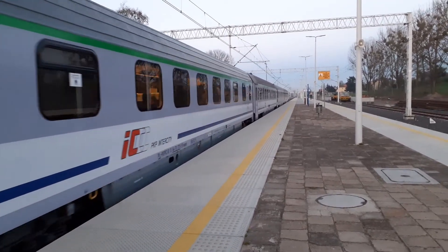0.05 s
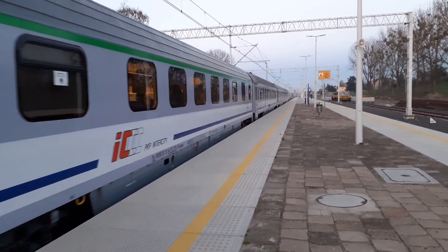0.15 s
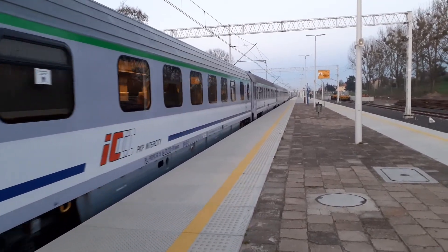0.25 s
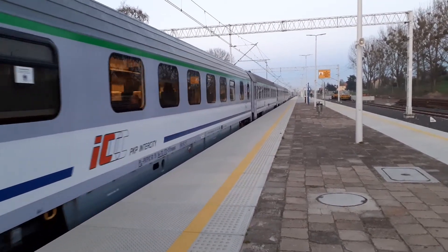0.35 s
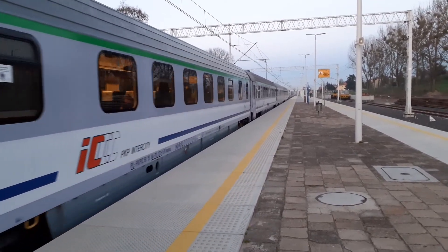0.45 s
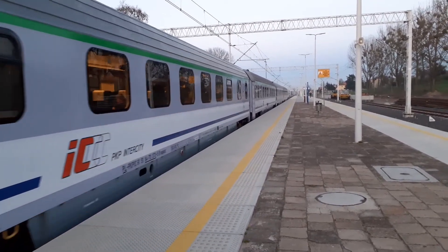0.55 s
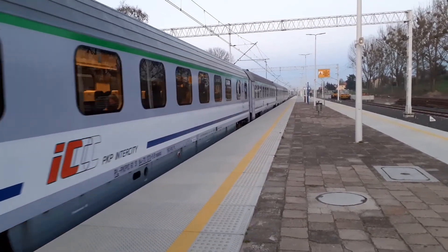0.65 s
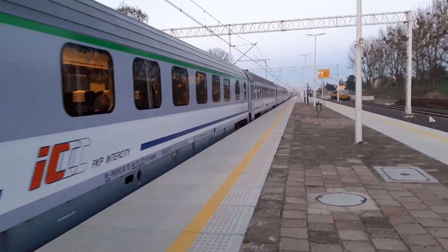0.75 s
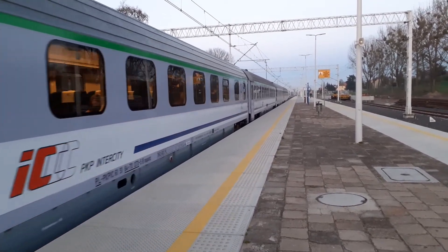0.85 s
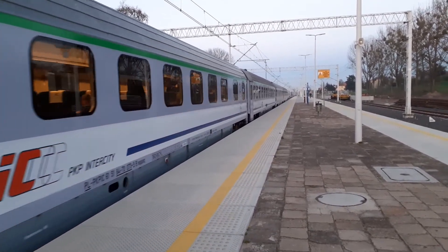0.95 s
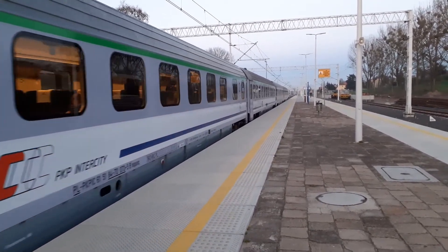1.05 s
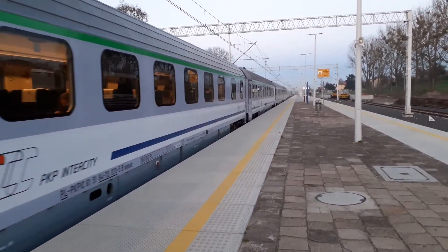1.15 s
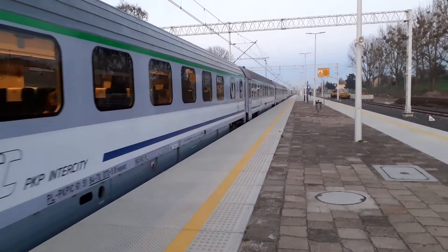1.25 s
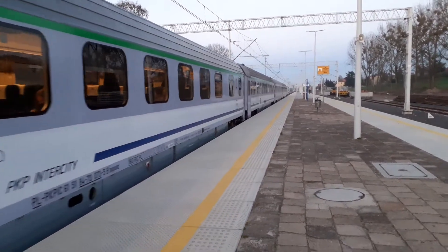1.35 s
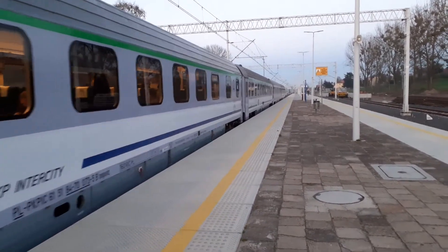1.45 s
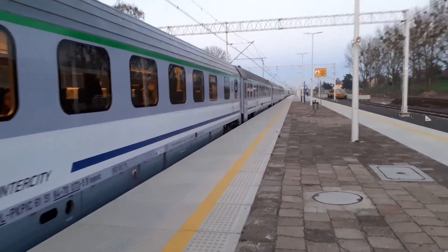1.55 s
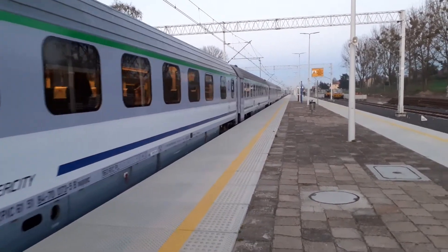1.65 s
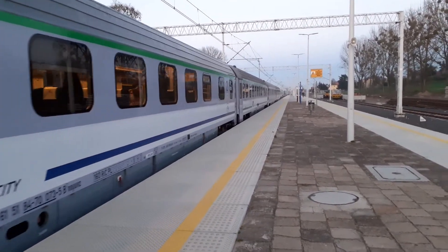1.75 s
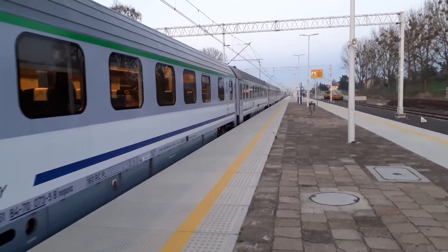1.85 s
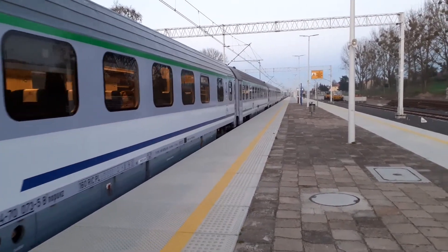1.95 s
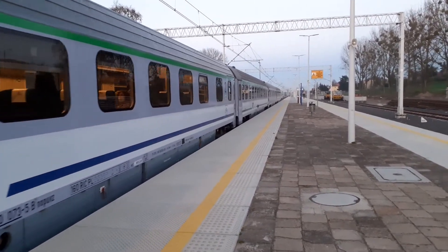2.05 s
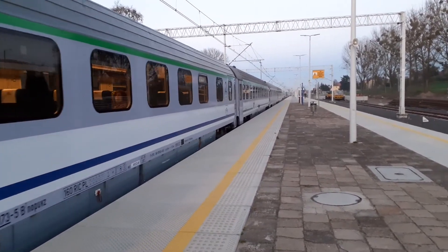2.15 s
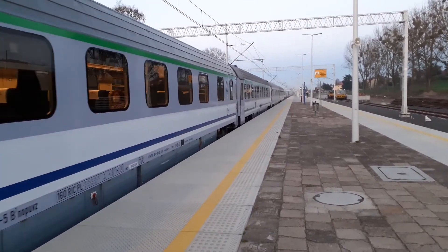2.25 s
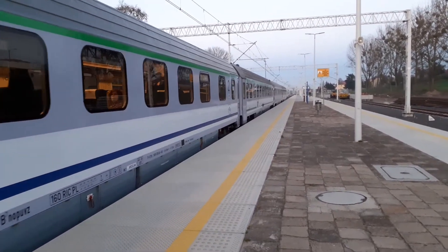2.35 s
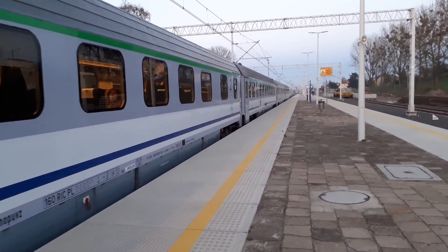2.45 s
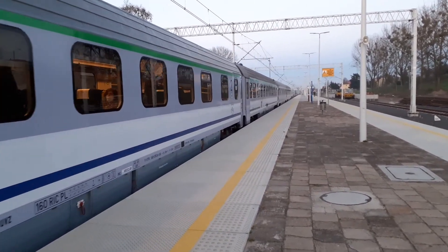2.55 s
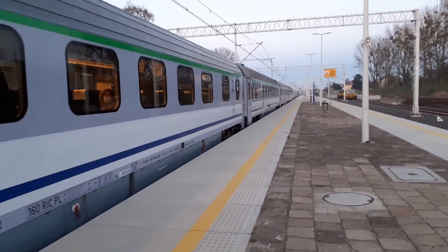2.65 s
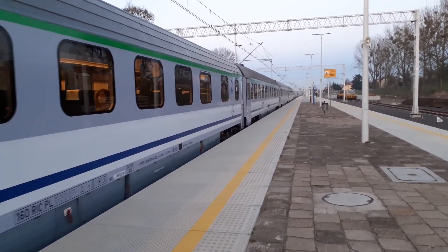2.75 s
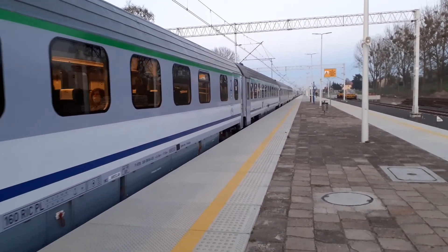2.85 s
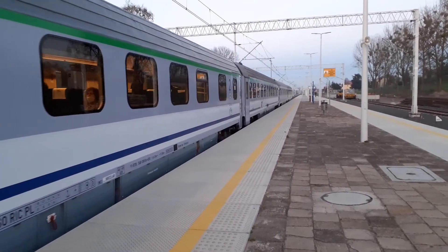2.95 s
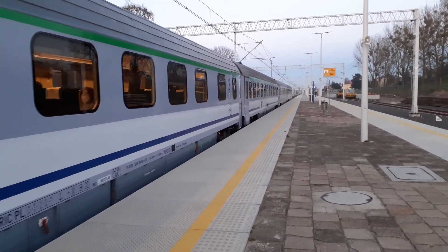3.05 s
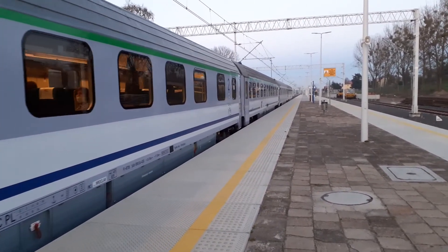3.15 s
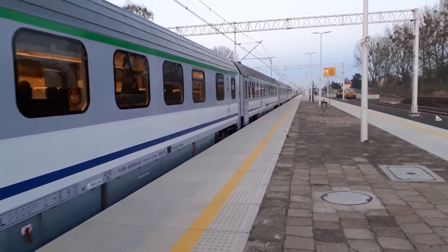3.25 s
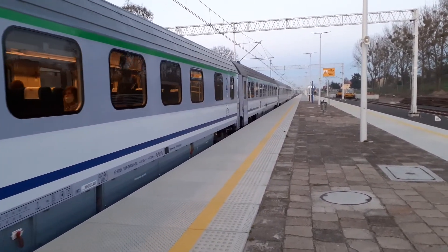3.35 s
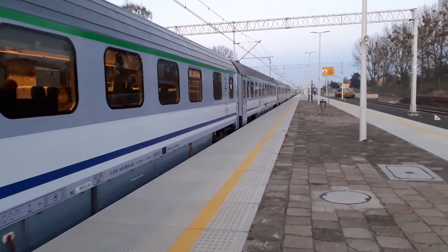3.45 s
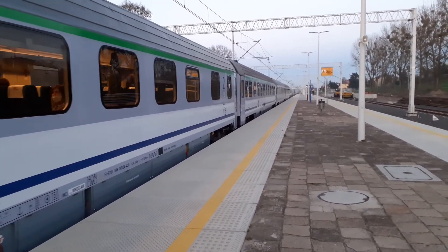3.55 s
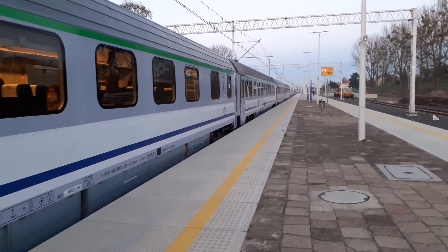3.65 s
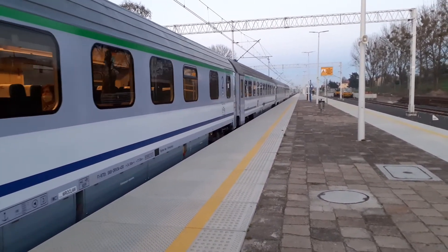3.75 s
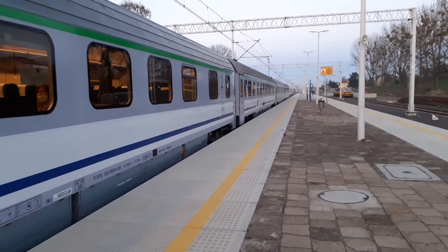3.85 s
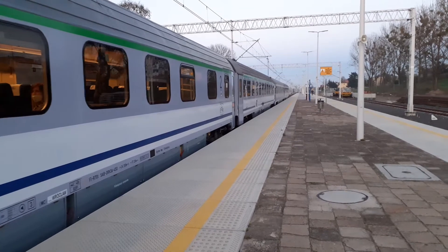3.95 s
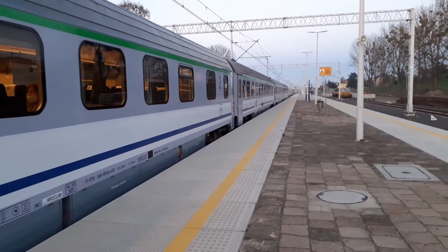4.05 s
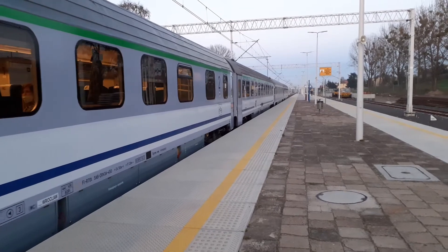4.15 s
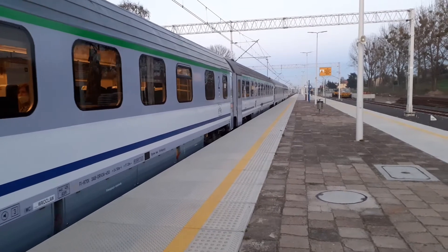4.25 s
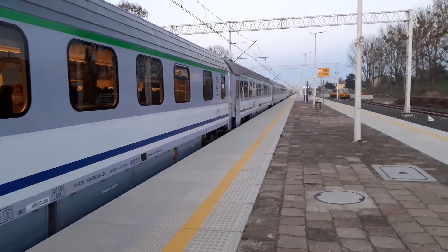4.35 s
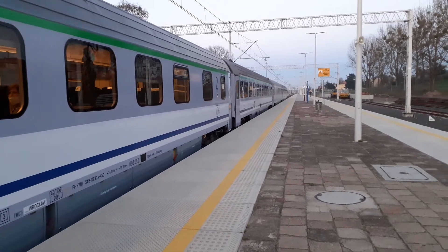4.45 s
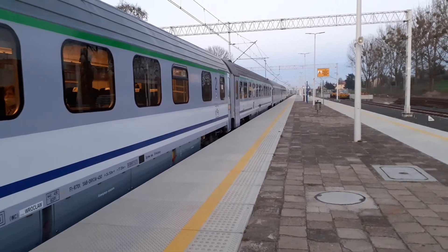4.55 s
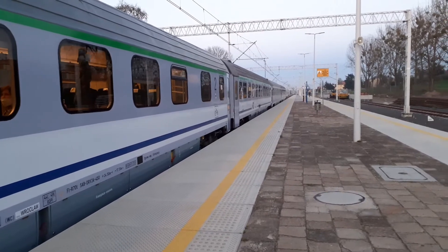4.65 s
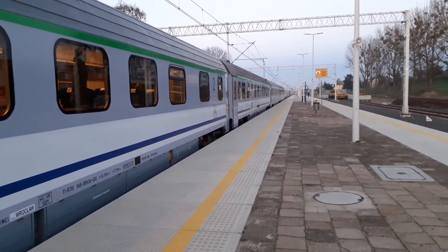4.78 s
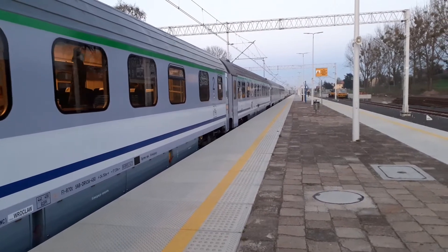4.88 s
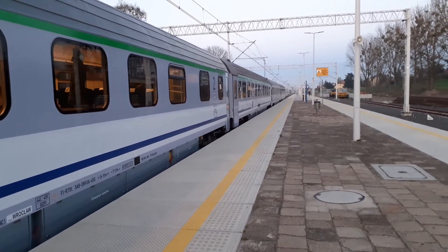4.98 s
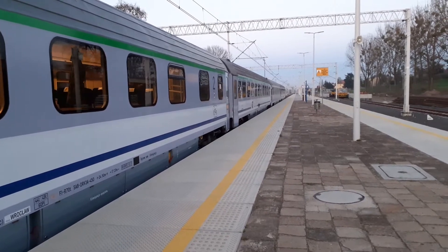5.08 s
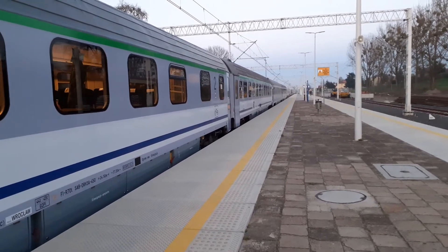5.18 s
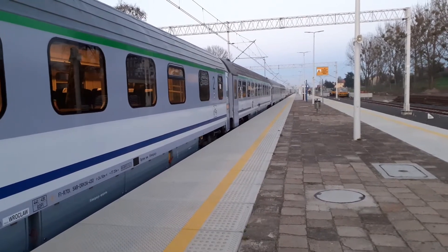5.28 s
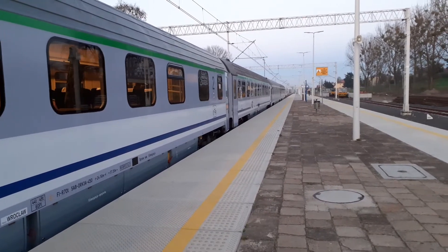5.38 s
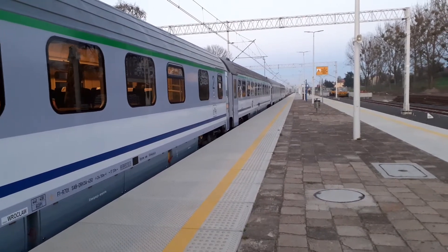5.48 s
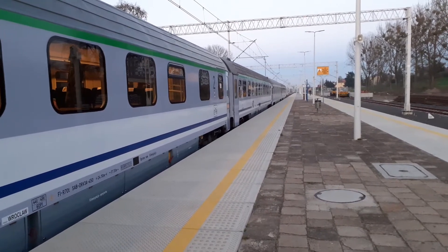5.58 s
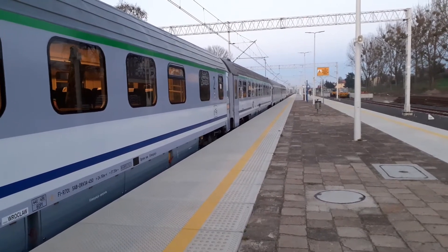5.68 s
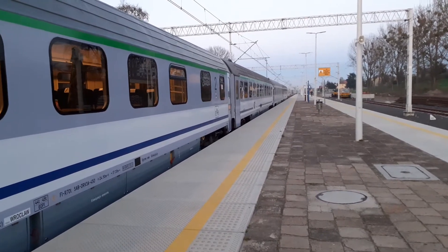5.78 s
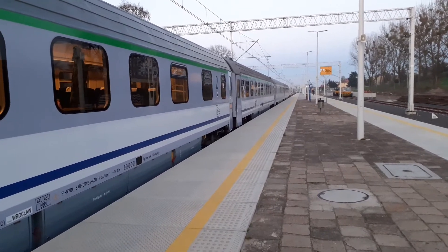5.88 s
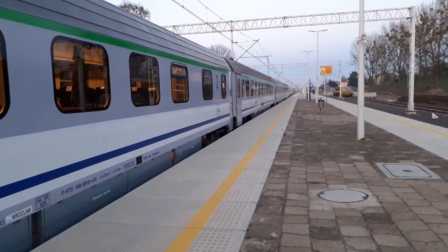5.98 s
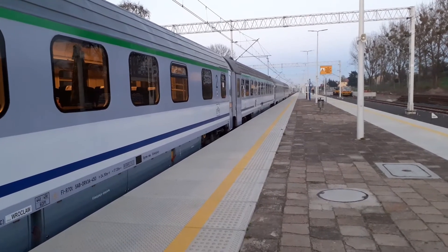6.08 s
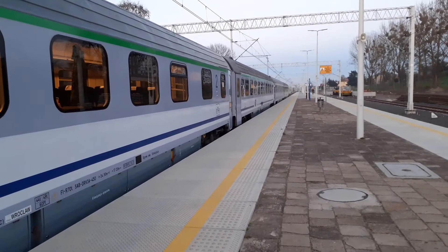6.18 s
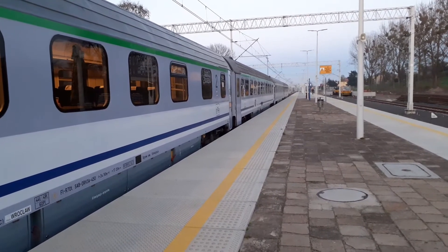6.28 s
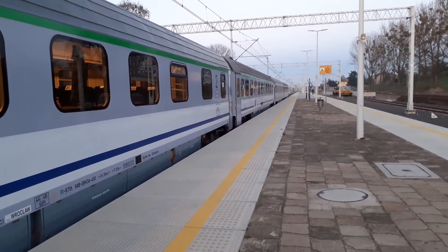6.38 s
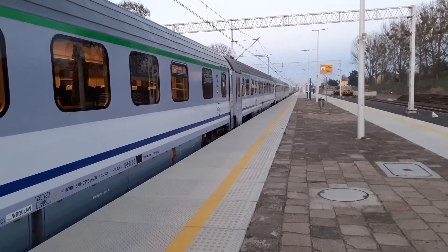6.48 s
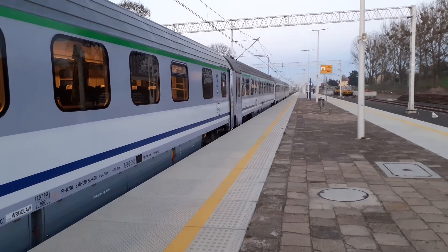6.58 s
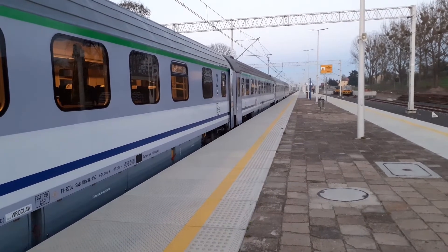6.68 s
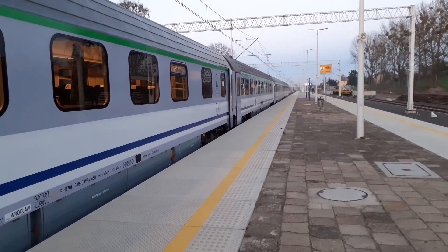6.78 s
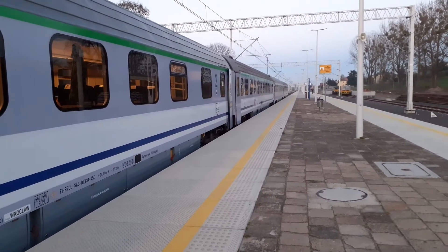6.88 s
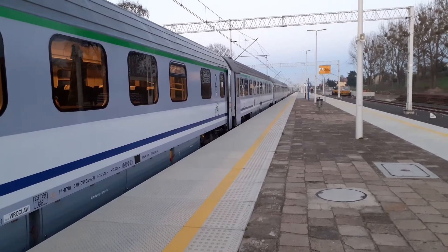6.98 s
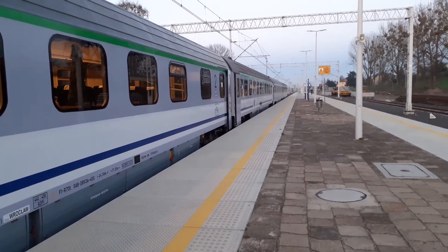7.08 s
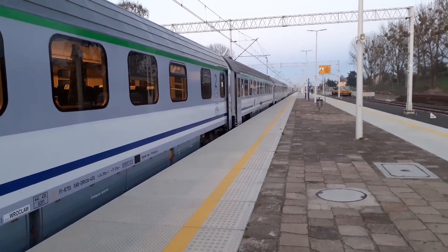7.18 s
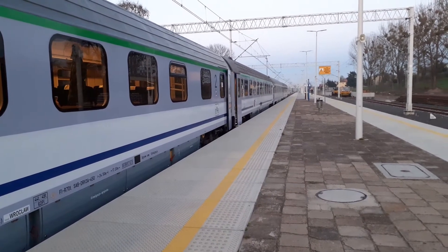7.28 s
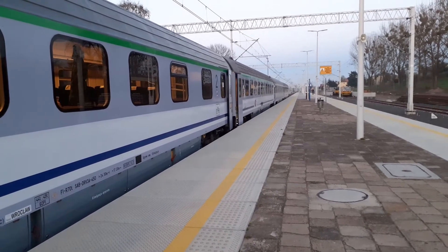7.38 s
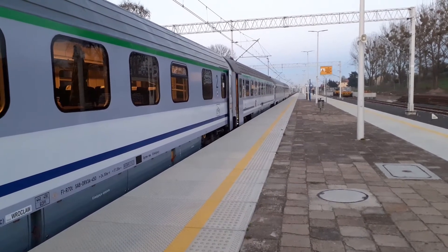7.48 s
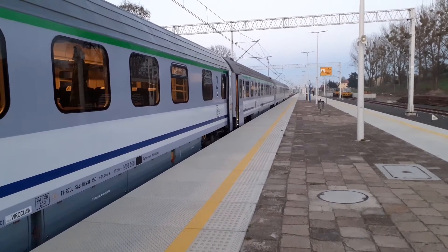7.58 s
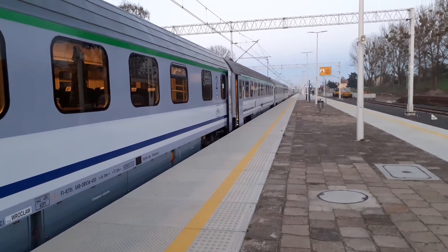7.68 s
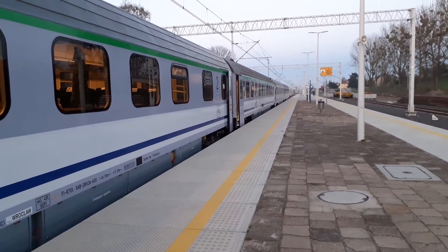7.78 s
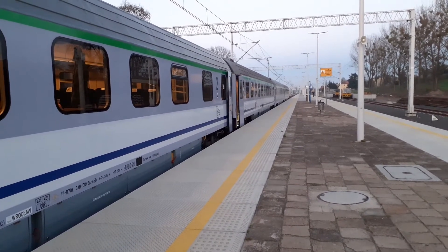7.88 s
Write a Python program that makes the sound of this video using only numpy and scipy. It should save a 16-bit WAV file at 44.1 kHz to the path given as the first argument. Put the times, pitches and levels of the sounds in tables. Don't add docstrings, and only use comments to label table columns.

```python
import sys
import numpy as np
from scipy import signal
from scipy.fft import rfft, irfft, next_fast_len
from scipy.io import wavfile
from scipy.ndimage import uniform_filter1d, map_coordinates

SR = 44100
rng = np.random.default_rng(int(sys.argv[2]) if len(sys.argv) > 2 else 0)


def gain_from_db(level_db):
    decades = np.asarray(level_db, float) / 20
    return 10 ** decades


def digitize_waveform(pressure):
    field = np.atleast_2d(pressure).T
    bounded = np.clip(field, -1, 1)
    quanta = np.round(bounded * 32767).astype(np.int16)
    wavfile.write(sys.argv[1], SR, quanta)


N = 349713
T = np.arange(N) / SR

# peak_s [s], peak_db [dB], grow_s [s], lose_s [s]
FLUTTER_BURSTS = [(2.15, -40, .39, .32), (2.36, -32, .05, .035), (2.395, -37, .03, .03),
                  (2.44, -34, .05, .04), (2.467, -31, .04, .03), (2.492, -27.5, .015, .013),
                  (2.51, -26, .014, .015), (2.543, -23.5, .033, .035), (2.595, -27.5, .035, .025),
                  (2.635, -32, .035, .03), (2.66, -22.5, .027, .022), (2.68, -33, .02, .03),
                  (2.737, -26, .04, .025), (2.78, -35, .03, .02), (2.806, -22, .018, .05),
                  (2.825, -19.5, .06, .06), (2.857, -17.5, .025, .035), (2.885, -32, .03, .02),
                  (2.925, -26, .035, .035), (2.955, -32, .02, .02), (2.972, -30, .02, .025),
                  (2.995, -35, .012, .012), (3.03, -37, .1, .2), (3.62, -34, .03, .025),
                  (3.652, -35, .02, .015), (3.687, -31, .025, .02), (3.72, -37, .03, .04),
                  (3.9, -39, .4, .25)]
CLEAN_BURSTS = [(3.225, -35, .049, .067), (3.33, -31, .04, .04), (3.385, -29, .1, .1),
                (3.43, -24.5, .09, .06), (3.48, -21, .04, .06), (3.5, -20, .05, .055),
                (3.543, -18.5, .035, .04), (3.568, -21, .03, .025), (4.09, -32, .066, .136)]
# peak_s [s], peak_db [dB], grow_s [s], lose_s [s]
ROD_BURSTS = [
    (3.82, -44.5, 0.1349, 0.2714),
    (4.15, -56, 0.269, .25),
]
# peak_s [s], peak_db [dB], grow_s [s], lose_s [s]
UPPER_BURSTS = [
    (5.22, -21.5, .075, .08),
    (5.255, -16.5, .07, .1),
    (5.3, -14.5, .12, .17),
    (5.42, -24.5, .1, .164),
    (5.68, -52.5, .2, .334),
]
LOWER_BURSTS = [(4.775, -37, .036, .07), (4.88, -47, .1, .1), (5.02, -27, .064, .045),
                (5.11, -28, .023, .05), (5.14, -21, .03, .05), (5.162, -17, .045, .025),
                (5.205, -25, .06, .08), (5.235, -21.5, .05, .08), (5.26, -22, .1, .166),
                (5.42, -34, .1, .208), (5.62, -49, .2, .17)]
# peak_s [s], peak_db [dB], grow_s [s], lose_s [s]
HALF_BURSTS = [(4.755, -33, 0.03827, .03), (4.785, -31, .03, .04), (4.835, -37.5, .02, 0.0406),
               (5.16, -37.5, 0.033, .04), (5.195, -35, .03, 0.04886), (5.28, -31.5, 0.03866, 0.0886),
               (5.35, -52.5, .3, 0.3088)]
QUARTER_BURSTS = [
    (4.77, -35.5, 0.0648, 0.0525),
    (4.815, -43, .05, 0.0725),
]
# time_s [s], below_upper_hz [Hz]
MODE_SPLIT = [(4.6647, 28), (5.172, 28), (5.18, 42), (5.228, 42), (5.234, 21), (5.29, 22.6), (5.33, 28.5),
              (5.4, 28.1), (6, 28)]
# multiple [ratio], level_db [dB]
OVERTONES = [(1, 0.5), (1.5, -44), (2, -42), (2.5, -46), (3, -45)]
WHEEL_HZ, UPPER_HZ, HALF_HZ, QUARTER_HZ, ROD_HZ = 4639, 4724, 2353, 1170, 600
LAST_WHEEL_S = (4.6647, 6)
DRIFT_HZ = 14

# time_s [s], slip_rate_hz [Hz], level_db [dB]
GROAN_PATH = [(4.74, 800, -55), (4.8, 795, -44.5), (4.9, 785, -45.5), (4.93, 748, -43.5), (5.12, 750, -45),
              (5.27, 778, -45.5), (5.35, 785, -57.5), (5.43, 792, -49.5), (5.72, 797, -68.5)]
# multiple [ratio], level_db [dB]
GROAN_MULTIPLES = [(3, -4), (4, -4.5), (5, -6.5), (7, -3.5), (8, -20)]
# peak_s [s], peak_db [dB], grow_s [s], lose_s [s]
GROAN_FLARE = [
    (4.945, -34.5, .04, 0.086),
]
# start_s [s], end_s [s], slip_rate_hz [Hz], level_db [dB]
SLIPS = [
    (3.78, 3.862, 828.7, -49),
    (4.01, 4.162, 820.3, -50),
    (4.21, 4.31, 622.4, -47.5),
    (4.28, 4.438, 779.5, -52),
    (4.39, 4.492, 618.5, -46.5),
    (4.451, 4.601, 786.3, -50),
]
# multiple [ratio], level_db [dB]
SLOW_SLIP = [(1, 2), (3, -1.5), (4, -4.5), (5, -5), (6, -0.5)]
FAST_SLIP = [(1, 2), (2, 0), (3, -6), (4, -5.5)]
# start_s [s], end_s [s], pitch_hz [Hz], width_hz [Hz],
# level_db [dB]
WHINES = [(-.2, 1.7, 5430, 56, -41.5), (-.2, .35, 5260, 40, -48), (1.7, 4.1, 5820, 90, -50),
          (3.8, 4.7, 5495, 36, -45), (-.2, 1.7, 4030, 150, -46), (-.2, 1.4, 4740, 80, -48),
          (1.28, 1.62, 810, 50, -40), (1.28, 1.62, 1590, 60, -40), (.2, .55, 970, 45, -43.5),
          (3.55, 4.7, 2150, 20, -56), (2.7, 3.35, 8030, 50, -59), (4.98, 5.2, 3935, 24, -43.5),
          (5.19, 5.36, 3902, 8, -40), (5.3, 5.62, 3900, 14, -45), (4.6, 8.2, 5670, 110, -55),
          (5.7, 8.2, 2900, 30, -64), (6.7, 8.6, 5670, 90, -51), (5.15, 5.42, 6290, 30, -52),
          (4.97, 5.3, 5490, 45, -47), (5.2, 5.5, 5500, 20, -51), (5.13, 5.41, 7075, 45, -48),
          (5, 5.32, 3130, 60, -48), (5.33, 5.5, 3140, 30, -54), (4.91, 5.17, 2255, 65, -46),
          (5.36, 5.55, 1590, 25, -56), (1.82, 2.1, 5810, 45, -46), (3.85, 4.55, 870, 80, -53),
          (4.55, 4.95, 5570, 60, -50), (7.58, 7.8, 2900, 30, -64)]
# start_s [s], end_s [s], pitch_hz [Hz], level_db [dB]
CREAKS = [(.3, .52, 850, -44), (1, 1.12, 850, -42), (1.4, 1.6, 2600, -43), (2.05, 2.15, 8050, -60),
          (2.78, 2.93, 6930, -45), (4.1, 4.28, 8050, -61), (4.25, 4.5, 960, -52), (5.13, 5.23, 4672, -40),
          (4.73, 4.79, 5820, -47), (5.15, 5.22, 3530, -49), (7.75, 7.81, 1290, -59),
          (7.855, 7.93, 2900, -56), (4.87, 4.93, 3150, -51), (5.55, 5.64, 7820, -63),
          (5.57, 5.65, 797, -54)]

# time_s [s], level_db [dB]
ROLLING_LEVEL = [(0, -36), (.68, -35), (1.04, -37), (1.28, -37.5), (1.32, -35), (1.58, -37.5),
                 (1.74, -39.5), (2.85, -42.5), (3.75, -47.5), (4.39, -48.5), (4.77, -53), (5.08, -48),
                 (5.21, -54), (5.3, -63), (5.42, -73), (7.93, -84.5)]
# freq_hz [Hz], density_db [dB per Hz]
RUMBLE_SPECTRUM = [(12, -57), (20, -31.5), (41, -8.5), (87, 3.5), (102, -1), (145, -3), (211, -5.5),
                   (255, -9), (311, -10), (400, -16.5), (520, -36), (880, -120)]
DRONE_SPECTRUM = [(150, -23.5), (250, -4), (302, -2.5), (350, -5.5), (558, -8.5), (688, -8.5), (830, -6),
                  (1030, -8.5), (1500, -9), (1950, -39.5), (3300, -120)]
GRIND_SPECTRUM = [(880, -31), (1500, -7), (1630, 1), (1980, -1.5), (2580, 0.5), (5040, -1), (5340, -1),
                  (7000, -12), (9100, -44), (15400, -120)]
LAYERS = {"rumble": (-40.5, 0.8584, -60, 8.5), "drone": (-45.5, 0.7356, -66.5, 6.5),
          "grind": (-36, 1.0, -63.5, 6)}
# peak_s [s], peak_db [dB], grow_s [s], lose_s [s]
JOLTS = [
    (3.33, -52, 0.202, 0.1769),
    (4.7, -55, 0.2925, 0.3085),
    (5.08, -50.5, 0.1494, 0.128),
    (5.83, -54, 0.272, 0.229),
    (6.82, -49.5, 0.1049, .3),
]
# peak_s [s], peak_db [dB], grow_s [s], lose_s [s]
BOGIE_SWELLS = [
    (0, -27, .2, 0.2782),
    (.54, -28, 0.2374, 0.517),
    (1.0, -29.5, 0.5, 0.173),
    (1.45, -32, 0.3266, 0.3036),
]
ROLLING_START_DB = -36
SLOWING_DB_PER_S = 4.0
DOOR_OPENS_S, DOOR_OPENING_S = 6.7167, 0.2954

# time_s [s], peak_db [dB], pitch_hz [Hz], second_pitch_hz [Hz], burst_s [s]
TICKS = [
    (6.458, -28, 2100, 3700, .0035),
    (6.506, -35, 3971, 2900, .0028),
    (6.79, -27, 4151, 3800, .006),
    (7.029, -15.5, 2450, 4600, .002),
    (7.632, -35, 1450, 2150, .012),
]
# start_s [s], length_s [s], scrape_db [dB], boom_hz [Hz], boom_db [dB]
THUDS = [
    (5.852, .01, -53.5, 220.1, -51.5),
    (6.788, 0.05056, -34, 206.1, -23.5),
    (6.98, 0.054, -45, 209.3, -37),
    (7.0, .035, -50, 310, -35),
    (7.124, 0.010162, -49.5, 223.9, -36.5),
    (7.63, 0.035, -44, 139.6, -30.5),
    (7.82, .04, -49, 137.8, -34),
]
# time_s [s], pitch_hz [Hz], level_db [dB]
HINGE = [(7.69, 2130, -62), (7.715, 2230, -57), (7.74, 2300, -61), (7.77, 2370, -53), (7.795, 2430, -56),
         (7.81, 2430, -66)]
# freq_hz [Hz], density_db [dB per Hz]
SCRAPE_SPECTRUM = [(100, -19), (250, 5.5), (500, -8), (900, -4), (1500, -5), (2800, -15), (4900, -12),
                   (6500, -23), (9000, -63.5)]
CRACK_SPECTRUM = [(250, -14), (900, -13), (1500, -7), (2300, -6.5), (3500, 0.5), (5000, -7), (7000, -15.5),
                  (8500, -36), (12000, -68.5)]

# time_s [s], level_db [dB]
AIR_FLOW = [(0, -42.5), (1.04, -43.5), (2, -46), (2.87, -44.5), (3.1, -46.5), (3.8, -46), (4.6, -50),
            (4.78, -46), (5.21, -47), (5.34, -50), (5.5, -54), (5.72, -54.5), (5.8, -48), (6.02, -50),
            (6.35, -56.5), (6.8, -54), (7.1, -49.5), (7.93, -49.5)]
# freq_hz [Hz], density_db [dB per Hz]
AIR_SPECTRUM = [(1470, -50), (2500, -24.5), (2810, -8), (3420, -19.5), (3740, -1), (5050, -2.5), (5710, 1),
                (6180, -1.5), (7730, -10.5), (8640, -27.5), (9500, -23), (12400, -45.5), (20900, -120)]
LEFT_HISS = [(7500, -41.5), (8700, -19.5), (9500, -8.5), (11300, 0), (12300, -3), (13200, -7.5),
             (15000, -6.5), (15800, -10.5)]
RIGHT_HISS = [(9800, -61), (10300, -33), (11500, -24), (13000, -8), (15700, -4.5), (15800, -89)]

# freq_hz [Hz], gain_db [dB]
FACING_PORT = [(20, -10.5), (45, 8), (70, 3), (300, 5), (800, 6.5), (16000, 6)]
SHADE = [(40, -4), (90, -1.5), (200, -7.5), (430, -11.5), (800, -17), (2300, -24.5), (4100, -36),
         (5500, -70), (8000, -80), (16000, -36)]
# freq_hz [Hz], likeness [0-1]
LIKENESS = [(60, 1), (430, 0.92), (800, 0.66), (1400, 0.56), (3000, 0.21), (5000, 0.2), (16000, .1)]
LAG_S, REST_LAG_S, PHASE_LAG_RAD = .00041, .00012, .55
STOP_S, TOP_HZ = 5.7, 15790
TAP_S, TAP_DB = 1.558, -36.5


def squeal():
    out = sing(FLUTTER_BURSTS, WHEEL_HZ, 0.17, 260, (1.8, 4.5), DRIFT_HZ)
    out += sing(CLEAN_BURSTS, WHEEL_HZ, 0.04053, 60.164, (3.1, 4.3), DRIFT_HZ / 4)
    out += sing(ROD_BURSTS, ROD_HZ, .15, 19.72, (3.6, 4.5))
    last = T[int(LAST_WHEEL_S[0] * SR):int(LAST_WHEEL_S[1] * SR)]
    lower_hz = UPPER_HZ - np.interp(last, *np.transpose(MODE_SPLIT))
    for rows, hz in ((LOWER_BURSTS, lower_hz), (UPPER_BURSTS, UPPER_HZ)):
        for k, rel_db in OVERTONES:
            out += gain_from_db(rel_db) * sing(rows, k * hz, .005 * k ** 4, 47, LAST_WHEEL_S)
    out += sing(QUARTER_BURSTS, QUARTER_HZ, 0.1757, 62.73, LAST_WHEEL_S)
    out += gain_from_db(-2.5) * sing(QUARTER_BURSTS, 3 * QUARTER_HZ, 0.698, 120, LAST_WHEEL_S)
    return out + sing(HALF_BURSTS, HALF_HZ, 0.3783, 150, LAST_WHEEL_S)


def groan():
    out = np.zeros(N)
    span, hz, level_db = curves(GROAN_PATH)
    first = tone(hz, 0.9164, width_hz=90)
    top = sum(gain_from_db(rel_db) * tone(k * hz, .8, width_hz=150) for k, rel_db in GROAN_MULTIPLES)
    second_gain = np.hypot(gain_from_db(level_db - 3.5), gain_from_db(bursts(GROAN_FLARE, span)))
    second = second_gain * tone(2 * hz, 0.6022, width_hz=120)
    out[span] = gain_from_db(level_db - 1.0) * (first + gain_from_db(0.8731) * top) + second
    return out


def block_slips():
    rows = []
    for start, end, hz, db in SLIPS:
        multiples = SLOW_SLIP if hz < 700 else FAST_SLIP
        rows += [(start, end, k * hz, 45, db + rel_db) for k, rel_db in multiples]
    return swelling_lines(rows)


def whines():
    return swelling_lines(WHINES)


def creaks():
    return swelling_lines([(start, end, hz, 45, db + 1.5) for start, end, hz, db in CREAKS])


def rolling():
    sway = wobble(4.4178)
    fall_db = curves(ROLLING_LEVEL)[1] - ROLLING_START_DB
    speed_gain = follow(-SLOWING_DB_PER_S * T, *LAYERS["rumble"])
    rumble = np.hypot(speed_gain, gain_from_db(bursts(JOLTS, slice(N))))
    rumble *= gain_from_db(7.5 + 0.769 * sway + 1.067 * wobble(9.8)) * rush(RUMBLE_SPECTRUM, patchy_db=0.0)
    drone = follow(fall_db, *LAYERS["drone"])
    drone *= gain_from_db(8.5 + 0.6191 * sway + 0.4407 * wobble(11)) * rush(DRONE_SPECTRUM, patchy_db=1.0)
    grind = follow(fall_db, *LAYERS["grind"])
    grind *= gain_from_db(5.5 + 0.5433 * sway + 0.3626 * wobble(14)) * rush(GRIND_SPECTRUM, patchy_db=1.3533)
    return rumble + drone + grind


def bogies():
    out, span = np.zeros(N), slice(0, int(4.7 * SR))
    fall_db = -1.3317 * SLOWING_DB_PER_S * T[span]
    flat = np.ones(len(fall_db))
    low = np.hypot(gain_from_db(-30.5 - 3 + fall_db), gain_from_db(bursts(BOGIE_SWELLS, span)))
    high = gain_from_db(-31.5 + fall_db + 2 * wobble(3.4873, size=len(flat)))
    out[span] = low * tone(96 * flat, .9, width_hz=50) + high * tone(210 * flat, .9, width_hz=50)
    return out


def door():
    out, t = np.zeros(N + SR), np.arange(SR // 2) / SR
    grit = rush(SCRAPE_SPECTRUM, patchy_db=1.7426)
    crack = rush(CRACK_SPECTRUM, patchy_db=1.5)
    for s, db, hz, second_hz, burst in TICKS:
        after = np.maximum(t - burst, 0)
        snap = gain_from_db(-60 * after / 0.0123)
        tail = gain_from_db(-12 - 60 * after / 0.0957)
        shape = np.minimum(t / 0.0005423, 1) * (snap + tail)
        pair = np.sin(2 * np.pi * hz * t) + np.sin(2 * np.pi * second_hz * t)
        ring = crack[round(s * SR / 2):][:len(t)] + 0.9 * snap ** .3 * pair
        out[round(s * SR):][:len(t)] += gain_from_db(db - 11.0) * shape * ring
    for s, length, scrape_db, hz, boom_db in THUDS:
        t60 = 0.03137 + 1.8 * length
        after = np.maximum(t - length, 0)
        scrape = gain_from_db(scrape_db - 60 * after / 0.2053) * np.minimum(t / 0.004185, 1)
        scrape *= grit[round(s * SR / 3):][:len(t)]
        build = np.clip(t / length, 0, 1) ** 4
        decay = gain_from_db(boom_db - 60 * (after / t60) ** 1.5604)
        boom = decay * build * np.sin(2 * np.pi * hz * (t - length))
        out[round(s * SR):][:len(t)] += scrape + boom
    span, hz, db = curves(HINGE)
    out[span] += gain_from_db(db) * tone(hz, 0.2023, width_hz=60)
    return out[:N]


def brake_air():
    level_db = curves(AIR_FLOW)[1] + 3.0 + 0.738 * wobble(4.7)
    return gain_from_db(level_db) * rush(AIR_SPECTRUM, patchy_db=2.5)


def shaded_port(front):
    knots = rng.uniform(-8.5, 9.49, 500)

    def shaded(hz, lag):
        alike = np.clip(along(LIKENESS, hz), 0, 1)
        late = np.exp(-1j * (PHASE_LAG_RAD + 2 * np.pi * hz * lag))
        scattered = np.exp(1j * np.interp(hz, np.arange(500) * 50, knots))
        return gain_from_db(along(SHADE, hz)) * (alike * late + np.sqrt(1 - alike ** 2) * scattered)

    stopped = np.clip((T - STOP_S) / .3, 0, 1)
    moving = filtered(front * (1 - stopped), lambda hz: shaded(hz, LAG_S))
    return moving + filtered(front * stopped, lambda hz: shaded(hz, REST_LAG_S))


def port_hiss():
    level_db = -52 + 0.668 * (curves(AIR_FLOW)[1] - AIR_FLOW[0][1])
    left = gain_from_db(7.5) * rush(LEFT_HISS, patchy_db=1.5)
    right = gain_from_db(-16.0) * rush(RIGHT_HISS, patchy_db=1.0)
    return gain_from_db(level_db) * np.array([left, right])


def housing_tap():
    spectrum = [(9000, -40.5), (12000, -4), (16000, 0), (18000, -8)]  # Hz, dB per Hz
    tap = gain_from_db(TAP_DB - 60 * np.abs(T - TAP_S) / .012) * rush(spectrum, patchy_db=-2)
    return tap * gain_from_db([[3], [0]])


def sing(rows, hz, rough, width_hz, span_s, drift_hz=0):
    out = np.zeros(N)
    span = slice(int(span_s[0] * SR), int(span_s[1] * SR))
    db = bursts(rows, span)
    out[span] = gain_from_db(db) * tone(hz + drift_hz * wobble(70, size=len(db)), rough, width_hz)
    return out


def swelling_lines(rows):
    out = np.zeros(N)
    for start, end, hz, width, db in rows:
        fade = min(.3, 0.22435 * (end - start))
        span, swell = curves([(start, 0), (start + 0.24 * fade, 1), (end - fade, 1), (end, 0)])
        waver = .006 * wobble(14, size=len(swell)) * (end - start < .2)
        out[span] += gain_from_db(db) * swell * tone(hz * (1 + waver), width / 70, 1.6 * width)
    return out


def bursts(rows, span, bend=1.7926):
    levels = []
    for s, db, grow, lose in rows:
        side_s = np.where(T[span] < s, grow, lose)
        levels.append(db - 20 * (np.abs(T[span] - s) / side_s) ** bend)
    return np.max(levels, axis=0)


def follow(fall_db, start_db, slope, rest_db, door_db):
    opened = np.clip((T - DOOR_OPENS_S) / DOOR_OPENING_S, 0, 1)
    return np.hypot(gain_from_db(start_db + slope * fall_db), gain_from_db(rest_db + door_db * opened))


def tone(hz, rough, width_hz):
    rough = np.clip(rough, 0, 1)
    blur = (wobble(width_hz, size=len(hz)) + 1j * wobble(width_hz, size=len(hz))) / np.sqrt(2)
    ends = signal.windows.tukey(len(hz), min(1, 1500 / len(hz)))
    swing = (np.sqrt(1 - rough) + np.sqrt(rough) * blur) * ends
    return np.sqrt(2) * np.real(swing * np.exp(2j * np.pi * np.cumsum(hz) / SR))


def rush(spectrum, patchy_db):
    z = signal.stft(rng.standard_normal(N), nperseg=512)[2]
    field = uniform_filter1d(rng.standard_normal(z.shape), 4, 0)
    field = uniform_filter1d(field, 12, 1)
    x = signal.istft(z * gain_from_db(patchy_db * unit(field)), nperseg=512)[1][:N]
    return unit(filtered(x, lambda hz: gain_from_db(along(spectrum, hz))))


def filtered(x, response):
    m = next_fast_len(N + SR // 2)
    return irfft(rfft(x, m) * response(np.fft.rfftfreq(m, 1 / SR)), m)[..., :N]


def wobble(rate, size=N):
    knots = rng.standard_normal(int(size * 400 / SR) + 4)
    return map_coordinates(knots, [T[:size] * min(rate, 400)])


def curves(rows):
    s, *cols = np.transpose(rows)
    span = slice(max(int(s[0] * SR), 0), int(s[-1] * SR) + SR // 50)
    return [span] + [np.interp(T[span], s, c) for c in cols]


def along(points, hz):
    f, v = np.transpose(points)
    return np.interp(np.log(hz + 1), np.log(f + 1), v)


def unit(x):
    return x / np.sqrt(np.mean(np.abs(x) ** 2) + 1e-20)


def scene():
    train = squeal() + groan() + block_slips() + whines() + creaks() + rolling() + bogies()
    front = filtered(train + door() + brake_air(), lambda hz: gain_from_db(along(FACING_PORT, hz)))
    ports = np.array([front, shaded_port(front)]) + port_hiss()
    return filtered(ports, lambda hz: hz < TOP_HZ) + housing_tap()


def band_limit(x):
    return signal.sosfilt(signal.butter(12, 16990, fs=SR, output="sos"), x)


def record(dry):
    return band_limit(dry)


dry = scene()
out = record(dry)
digitize_waveform(out)
```